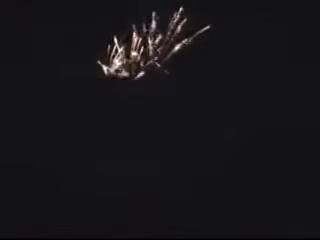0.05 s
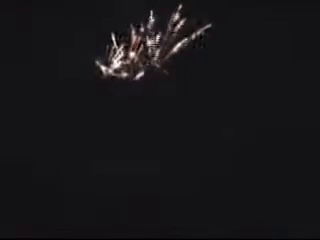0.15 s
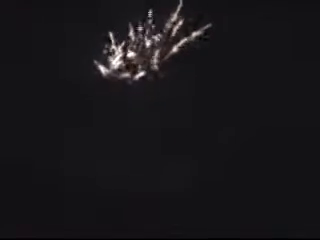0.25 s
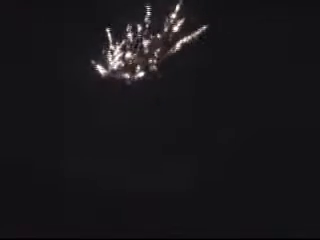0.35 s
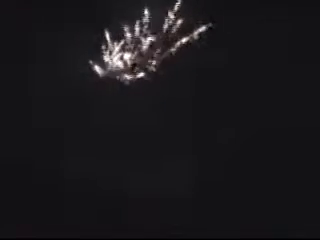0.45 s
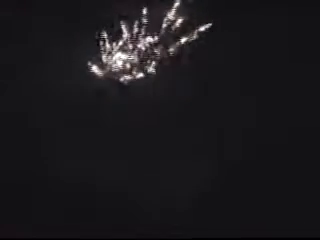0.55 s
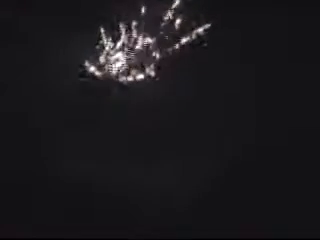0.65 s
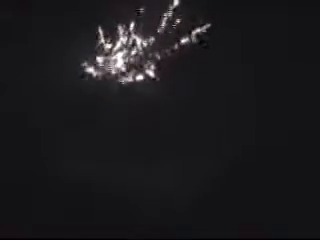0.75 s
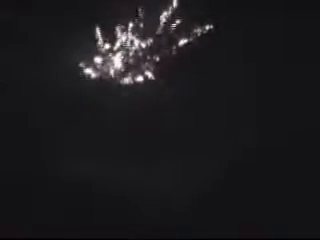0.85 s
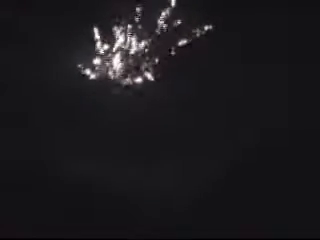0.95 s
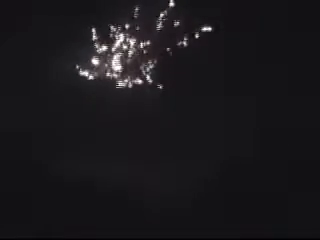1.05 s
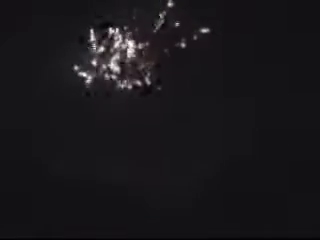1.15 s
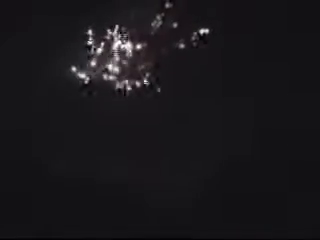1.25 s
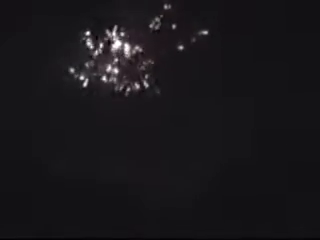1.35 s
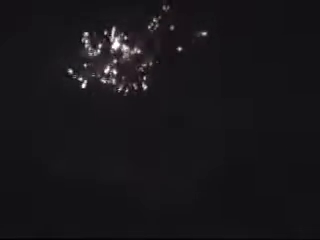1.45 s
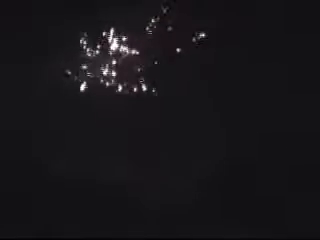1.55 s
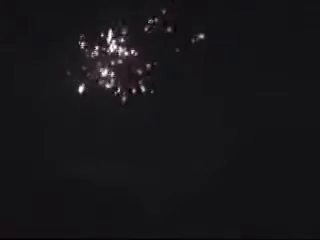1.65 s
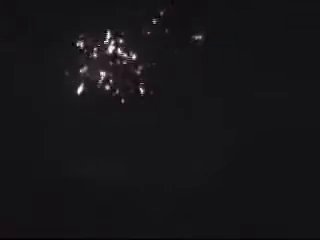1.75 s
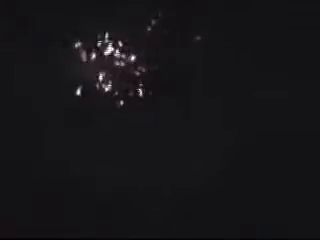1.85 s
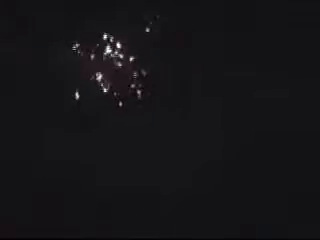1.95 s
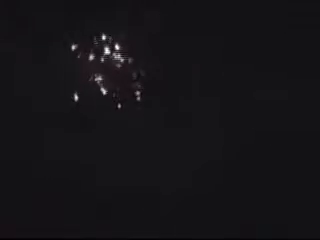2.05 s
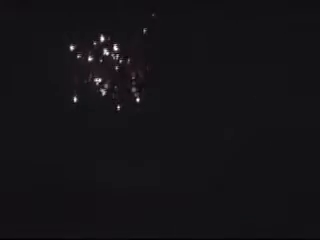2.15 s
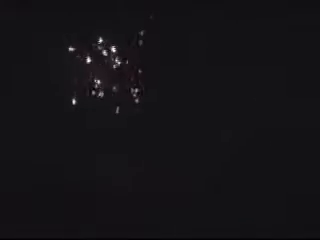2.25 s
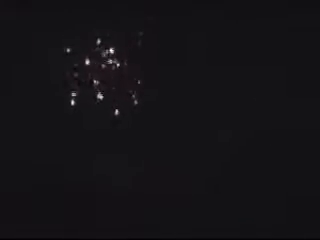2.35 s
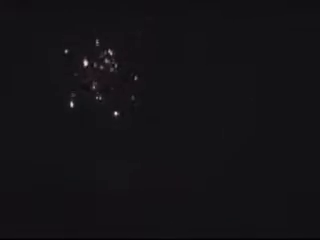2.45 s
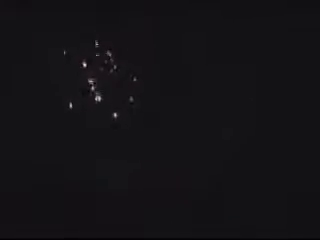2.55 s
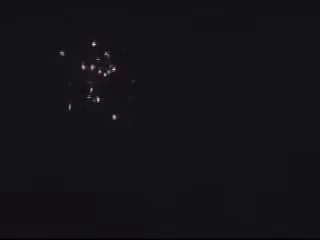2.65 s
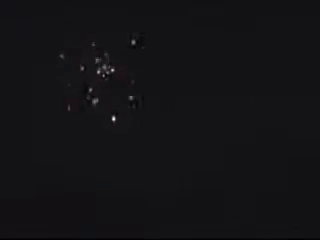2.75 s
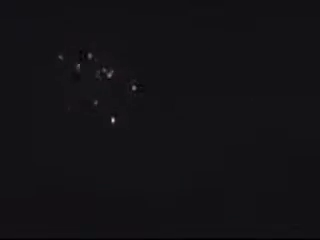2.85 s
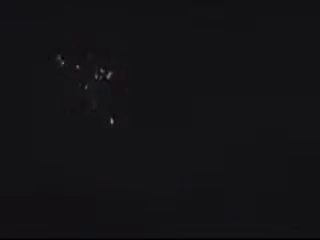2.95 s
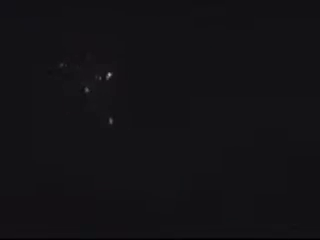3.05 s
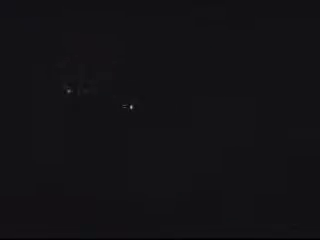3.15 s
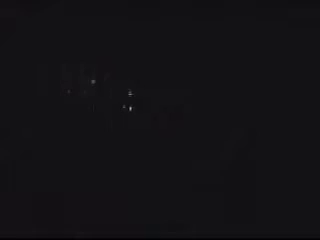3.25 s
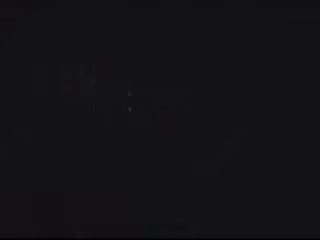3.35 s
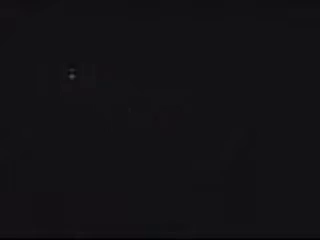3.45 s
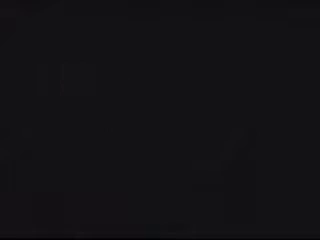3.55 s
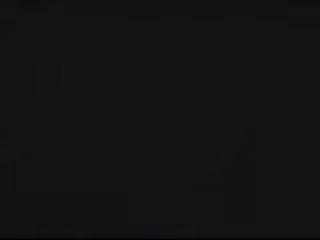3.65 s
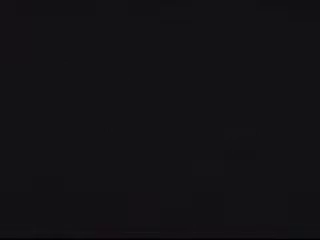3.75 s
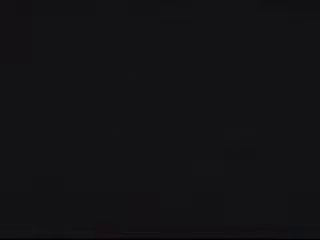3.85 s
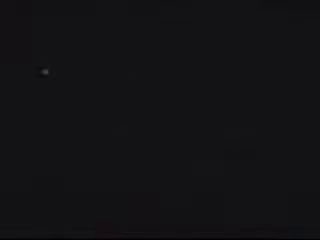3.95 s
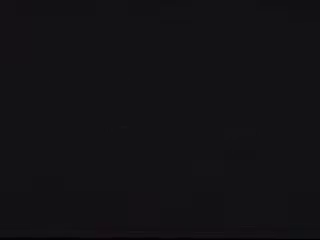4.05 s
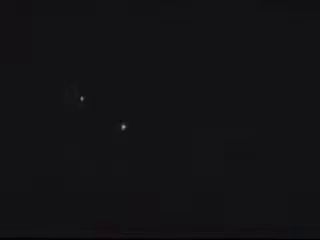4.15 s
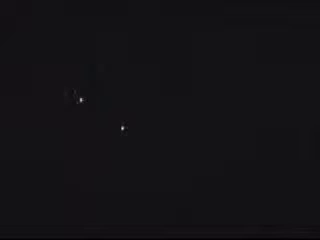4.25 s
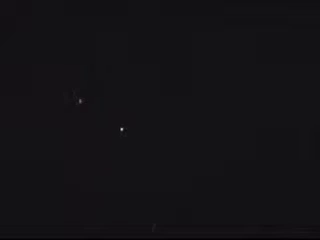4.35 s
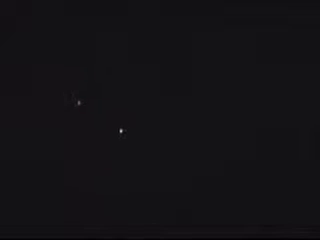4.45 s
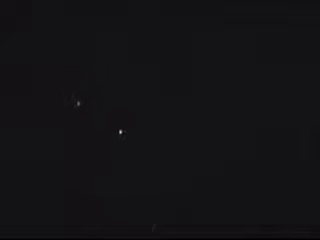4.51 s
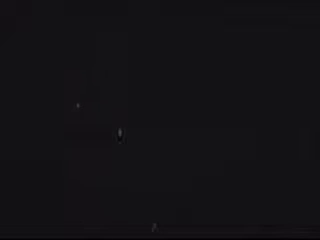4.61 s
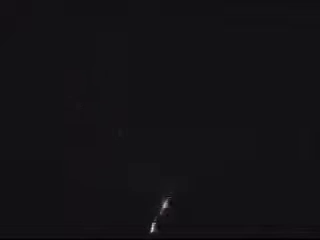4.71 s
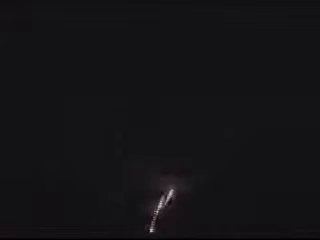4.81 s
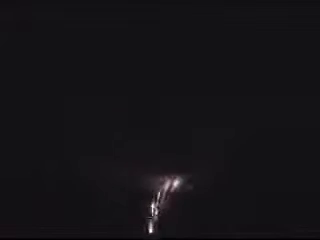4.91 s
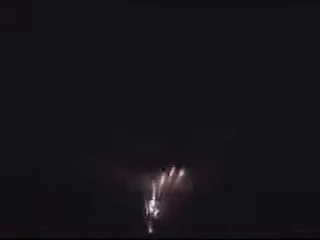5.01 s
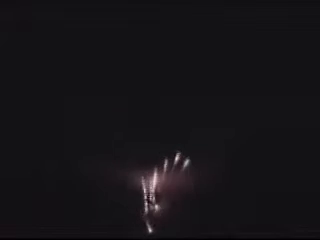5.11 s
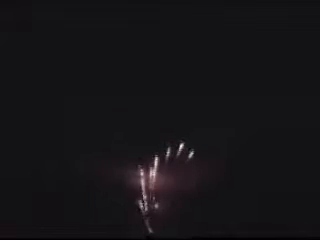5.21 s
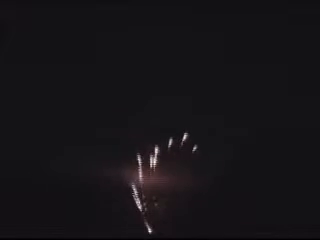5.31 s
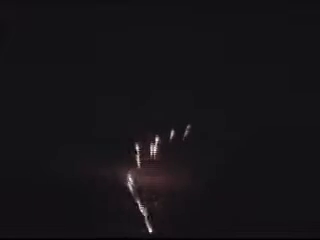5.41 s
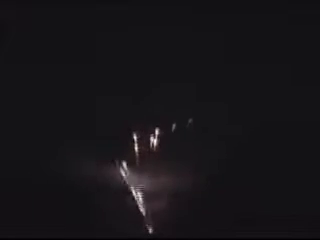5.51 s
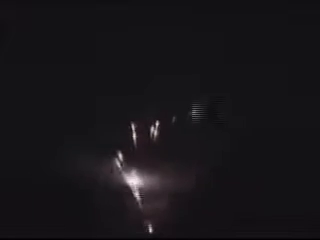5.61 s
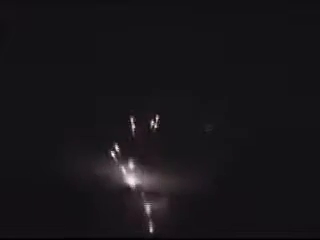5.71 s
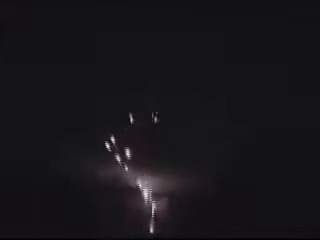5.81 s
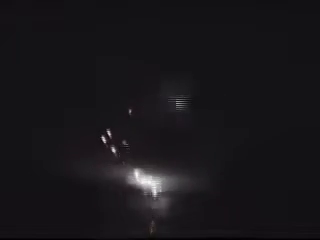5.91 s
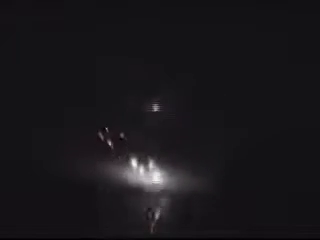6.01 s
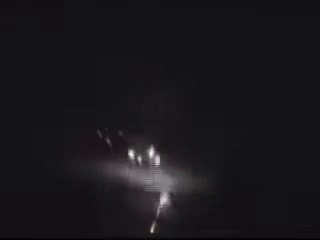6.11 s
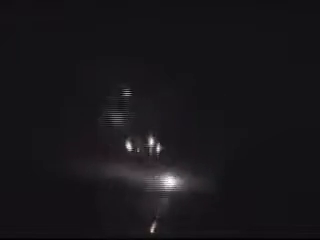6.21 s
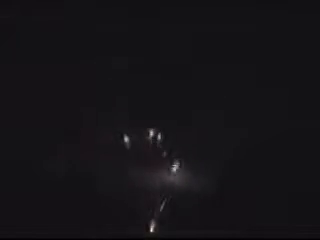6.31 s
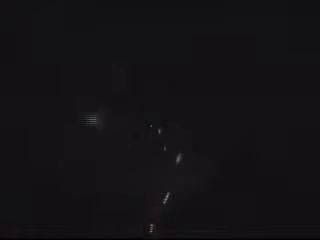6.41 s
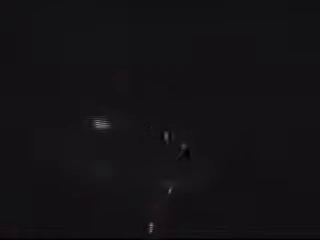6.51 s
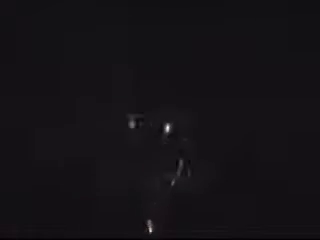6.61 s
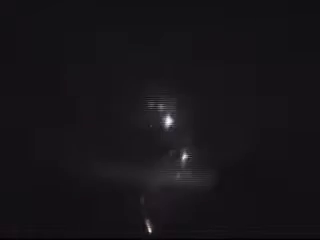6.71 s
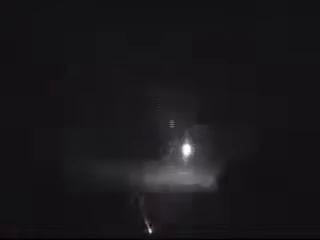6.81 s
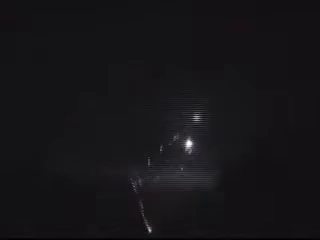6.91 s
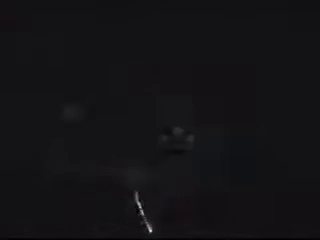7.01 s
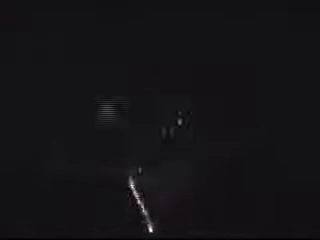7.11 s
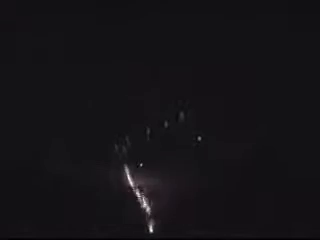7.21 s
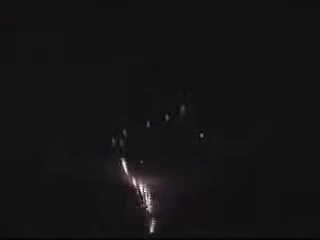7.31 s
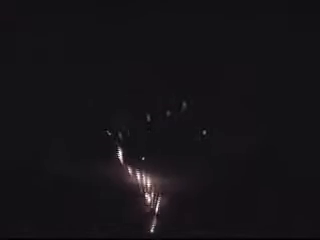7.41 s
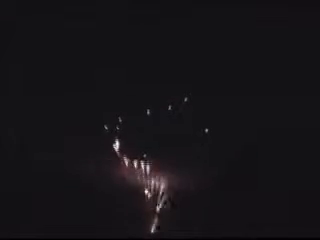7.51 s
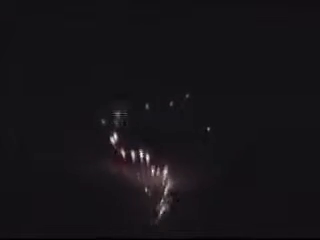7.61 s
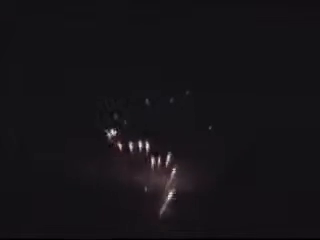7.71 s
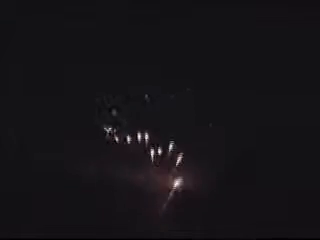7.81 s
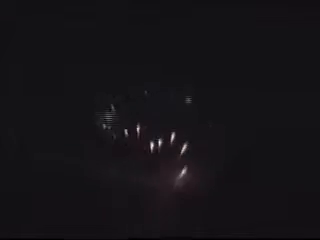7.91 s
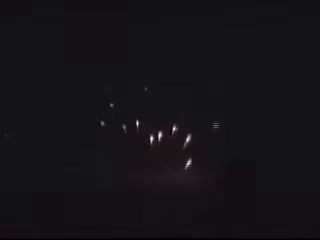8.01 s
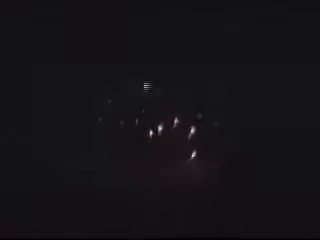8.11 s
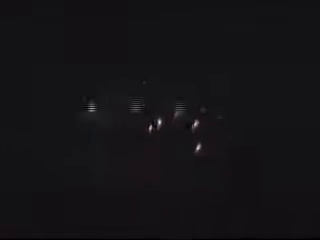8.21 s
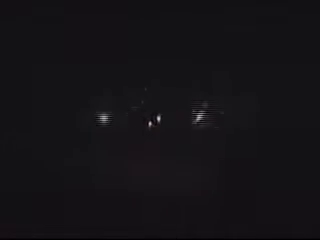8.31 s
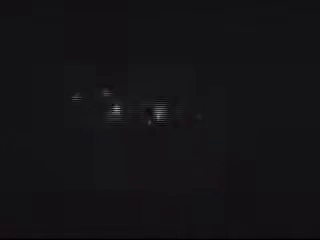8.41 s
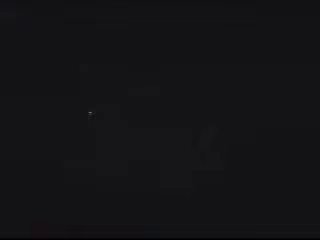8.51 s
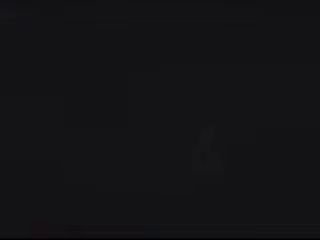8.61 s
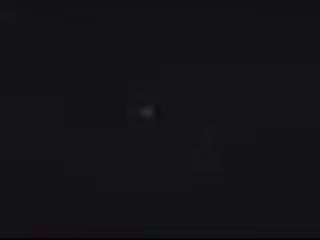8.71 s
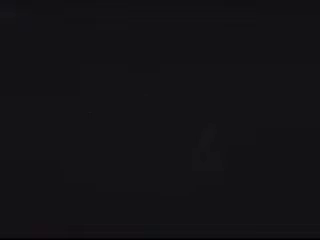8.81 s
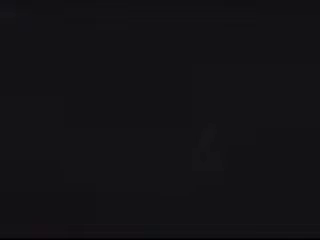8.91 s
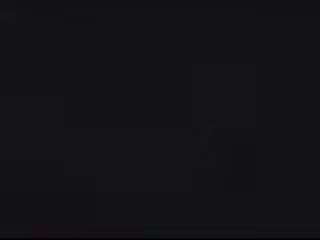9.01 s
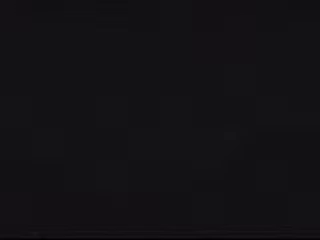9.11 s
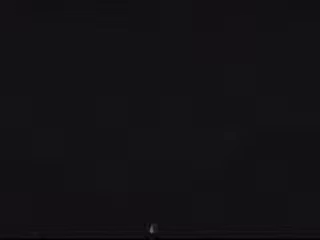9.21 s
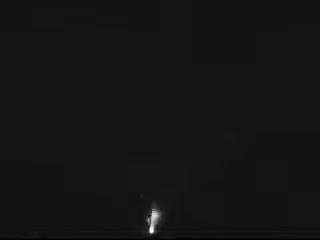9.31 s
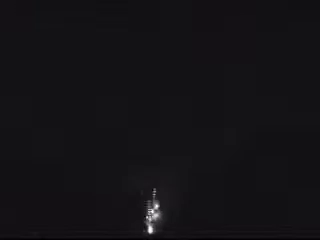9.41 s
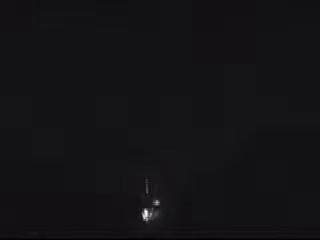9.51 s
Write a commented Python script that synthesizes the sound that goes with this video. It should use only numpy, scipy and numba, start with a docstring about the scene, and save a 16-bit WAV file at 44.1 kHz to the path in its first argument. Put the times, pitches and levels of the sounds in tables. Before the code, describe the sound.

The echo of a firework salvo rolls away into a night of trilling frogs and insects, then a rapid new salvo cracks and bangs.

```python
"""Open country at night: a firework salvo dies away, frogs and insects sing, then the next salvo fires.
Lift charges are noise bursts with a ringing tube and a low thump; stars are sharp shocks with ground bounces.
Trees and land answer with noise shaped by decaying echo levels. Frogs and insects are pulsed tones,
chirps are filtered noise, a cricket sings falling notes, and sparks and night air are coloured noise.
A camera adds its whine, widens the bass and the treble, limits the loudest bangs and clips their tips."""
import sys
import numpy as np
from scipy import signal
from scipy.fft import rfft, irfft, next_fast_len
from scipy.io import wavfile
from scipy.ndimage import uniform_filter1d
from numba import njit

SR = 44100
rng = np.random.default_rng(int(sys.argv[2]) if len(sys.argv) > 2 else 0)


def waveform_to_disk(signal):
    """Save audio, clipped to [-1, 1], as 16-bit WAV at the path in sys.argv[1]."""
    frames = np.transpose(np.atleast_2d(signal))
    scaled = np.clip(frames, -1, 1) * 32767
    samples = np.round(scaled).astype(np.int16)
    wavfile.write(sys.argv[1], SR, samples)


N = 421596
TIME = np.arange(N) / SR


def undb(db):
    """Turn dB into an amplitude factor."""
    return 10 ** (np.asarray(db) / 20)


def unit(x):
    """Scale to rms 1."""
    return x / np.sqrt(np.mean(x ** 2))


def gains(colour, size):
    """Gain of a colour on the bins of a real FFT."""
    hz, db = np.transpose(colour)
    bins_hz = np.fft.rfftfreq(size, 1 / SR)
    return undb(np.interp(np.log(bins_hz + 1), np.log(hz), db))


def tint(x, colour):
    """Filter a sound by a colour."""
    size = x.shape[-1]
    return irfft(rfft(x) * gains(colour, size), size)


def shock(colour, size=512):
    """The most sudden (minimum-phase) pulse of this colour, peak 1."""
    cepstrum = irfft(np.log(gains(colour, size)))
    # fold the cepstrum forward in time to put the energy first
    cepstrum[1:size // 2] *= 2
    cepstrum[size // 2 + 1:] = 0
    pulse = irfft(np.exp(rfft(cepstrum)))
    return pulse / np.abs(pulse).max()


def add(track, s, sound):
    """Mix a sound in at a time in seconds."""
    i = max(int(round(s * SR)), 0)
    part = sound[..., :max(N - i, 0)]
    track[..., i:i + part.shape[-1]] += part


def delay(x, s):
    """The same sound, later."""
    return np.interp(TIME - s, TIME, x, left=0)


def walk(rate, size=N):
    """Random values drawn at a rate per second and joined by straight lines."""
    steps = rng.standard_normal(int(size / SR * rate) + 2)
    return np.interp(TIME[:size] * rate, np.arange(len(steps)), steps)


def place(x, pan_db):
    """Pan by the left level minus the right level."""
    return x * undb(np.array([[pan_db], [-pan_db]]) / 2)


def diffuse(colour, side_db, size=N):
    """Noise from many directions: a shared part plus a part opposed between left and right."""
    mid, side = tint(rng.standard_normal((2, next_fast_len(size))), colour)[:, :size]
    return unit(mid) + undb(side_db) * unit(side) * np.array([[1], [-1]])


def fade(db, fall_db_per_s, hold_s=0):
    """A level that holds, then falls steadily."""
    return undb(db - fall_db_per_s * np.maximum(TIME - hold_s, 0))


# colours of the low, middle and high parts of a shot: (f/Hz, gain/dB)
BARK_COLOUR = [(100, -6), (450, -18.5), (780, -6), (1200, 5.5), (1650, -7), (2400, -44)]
CRACK_COLOUR = [(1200, -28), (1750, -10), (2400, -3.5), (3300, -7.5), (4200, -5.5), (5500, -37)]
SPIT_COLOUR = [(3300, -16), (4600, 2.5), (6400, 3), (9000, -2.5), (10300, -12.5), (11500, -59)]


def lift_crack(t, tube_hz, levels, rise_s=0.00099, decay_s=0.0018, lead_s=0.00015,
               ring_s=0.0018, front_s=0.001122):
    """A sudden front rings the tube inside a scattered burst; each part has its dB over 10 ms."""
    since_peak = t + lead_s
    swell = np.exp(-np.maximum(-since_peak / rise_s, since_peak / decay_s) ** 0.83)
    age = np.maximum(t + front_s, 0)
    ring = np.sqrt(age) * np.exp(-age / ring_s)
    pitches = (1240 * rng.uniform(.87, 1.15), tube_hz, 4600 * rng.uniform(.85, 1.3))
    colours = (BARK_COLOUR, CRACK_COLOUR, SPIT_COLOUR)
    ring_shares = (.5, .5, .2)  # of the power, before the parts are levelled
    out = 0
    for colour, hz, db, share in zip(colours, pitches, levels, ring_shares):
        scatter = unit(swell * diffuse(colour, side_db=-20.5, size=len(t)))
        tone = unit(ring * np.sin(2 * np.pi * hz * age))
        part = np.sqrt(1 - share) * scatter - np.sqrt(share) * tone
        out = out + undb(db) * part / np.sqrt(np.sum(part ** 2) / (2 * SR / 100))
    return out


def sputter(cracks, count=8, latest_s=0.15, return_db=-22):
    """Single trunks throw the cracks back as small stray snaps, weaker when later."""
    lags = rng.uniform(0.01, latest_s, count)
    return sum(undb(return_db - 30 * lag) * np.array([delay(c, lag) for c in cracks]) for lag in lags)


# lift charges in the tubes, levels relative:
# (t/s, tube ring f/Hz, bark level/dB, crack level/dB, spit level/dB, thump level/dB)
LIFT_CHARGES = [(5.066, 2270, -27.5, -17.5, -17.5, -25.5), (5.1949, 2530, -25.5, -14, -19, -20),
                (5.239, 2260, -23, -19, -18, -24.5), (5.323, 2300, -19.5, -16, -21.5, -19),
                (5.3742, 2550, -23.5, -18, -19, -24), (5.4031, 2180, -21, -19, -20.5, -22),
                (5.4369, 2180, -20.5, -15.5, -18, -21), (5.5405, 2550, -26.5, -18.5, -17.5, -25),
                (5.5957, 2360, -24.5, -18, -21.5, -26), (5.6739, 2520, -19.5, -17, -19, -25.5),
                (5.801, 2120, -19.5, -16, -17.5, -24.5), (5.8619, 2730, -19, -17, -21.5, -21.5),
                (5.9021, 2930, -15, -20, -21, -22.5), (5.936, 2270, -25, -17.5, -19.5, -27),
                (6.0471, 2300, -21.5, -19, -22.5, -24), (6.1093, 2490, -25, -19.5, -19.5, -25),
                (6.178, 2700, -25, -19.5, -21.5, -23), (6.2322, 2270, -27, -17.5, -21, -29.5),
                (6.2879, 2810, -22, -16.5, -18.5, -27), (6.3564, 2090, -19.5, -20, -19, -24),
                (6.465, 2170, -20, -20.5, -20, -23.5), (6.609, 2400, -25, -18.5, -19, -32),
                (6.683, 2480, -19, -19.5, -22.5, -33), (6.7505, 2800, -24, -27, -25, -24.5),
                (6.801, 2570, -28, -21, -24, -26), (6.846, 2500, -21, -19.5, -19, -23.5),
                (6.946, 2080, -20.5, -20.5, -19.5, -23), (7.0954, 2380, -22, -20, -23, -21.5),
                (7.1511, 2530, -21.5, -29, -26.5, -28), (7.1928, 2390, -24, -22.5, -22.5, -30),
                (7.227, 2320, -20, -20.5, -24, -26), (7.5046, 2490, -30, -22, -25, -30),
                (7.5587, 2010, -25, -19, -26.5, -31), (7.7195, 2260, -28, -21, -26, -29),
                (7.762, 2510, -26.5, -19.5, -25, -27), (7.8022, 2260, -27, -20.5, -24.5, -27.5),
                (7.911, 2390, -25, -18, -20.5, -22.5), (8.0003, 2130, -26, -20.5, -22, -35)]


def launches(shot_db=1, thump_db=2.5, thump_hz=145, thump_lag_s=0.0065, thump_width_s=0.0046):
    """Each lift charge cracks with its own colour, and its tube thumps just after."""
    cracks, thumps = np.zeros((2, N)), np.zeros(N)
    t = (np.arange(2048) - 512) / SR
    late = t - thump_lag_s
    for s, tube_hz, bark_db, crack_db, spit_db, low_db in LIFT_CHARGES:
        crack = lift_crack(t, tube_hz, (bark_db, crack_db, spit_db))
        add(cracks, s + t[0], undb(shot_db) * crack)
        pitch = thump_hz * (1 + 0.03 * rng.standard_normal())
        tube = np.cos(2 * np.pi * pitch * late) / (1 + (late / thump_width_s) ** 4)
        add(thumps, s + t[0], undb(low_db + thump_db) * tube)
    # a near obstacle returns the crack, a farther one the thump
    cracks = cracks + undb(-14) * np.array([delay(c, 0.024) for c in cracks])
    cracks = cracks + sputter(cracks)
    thumps = thumps + undb(-8.0) * delay(thumps, 0.086)
    return place(cracks, pan_db=-0.2) + place(thumps, pan_db=4.0)


# stars bursting overhead, levels relative: (t/s, level/dB, rolling echo level/dB)
STARS = [(6.1344, 4.5, 7), (6.1854, 5, 2), (6.3898, 7.5, 13), (6.4182, 5.5, 8.5), (6.555, 7, 9),
         (6.6876, 6, 10.5), (6.7323, 4, 2), (6.7662, 3.5, 10.5), (6.9711, 5.5, 4.5), (7.022, -3, -5),
         (7.043, -2.5, 7), (7.1036, 5, 7), (7.133, -2, 0), (7.2545, 4, 3), (7.2866, 4, 4), (7.351, -2.5, 9),
         (7.3783, 2.5, 8), (7.4106, 3, -8), (7.6032, 2.5, 7.5), (7.659, 3.5, 0), (8.1321, 0.5, 6),
         (8.3799, 1, 2.5), (8.3907, -3, 6), (8.4509, -3, -19), (8.4605, -3, -19), (8.5497, -4.5, -9),
         (8.569, 1, 4.5), (8.5997, -3.5, -7), (8.632, -3.5, -11), (8.7352, -3, 2), (8.765, -1.5, -4),
         (8.838, 1.5, 2), (8.9083, 1.5, 1.5), (8.9141, -4, -4), (8.983, -3.5, 6), (8.9855, -5.5, -1),
         (8.9903, -3.5, -5), (9.014, -2, 5.5), (9.2704, -3, 1)]
# colour of a star's shock: (f/Hz, gain/dB)
REPORT_COLOUR = [(40, -16.5), (170, -4.5), (420, -3), (780, 2), (1250, 2.5), (2000, -2.5), (3000, -7.5),
                 (6000, -12.5), (9000, -20), (11500, -76)]


def reports(report_db=4.5, ground_ms=2.42, ground_spread_ms=0.15, bounce_db=-3.5,
            fence_db=-12.0, fence_ms=3.97, scatter_db=-29.0, scatter_s=0.002):
    """Each star sends a clean shock; duller copies follow from the ground and from things nearby."""
    out = np.zeros((2, N))
    pulse = -shock(REPORT_COLOUR)
    dull = signal.sosfilt(signal.butter(1, 2600, fs=SR, output="sos"), pulse)
    t = np.arange(1024) / SR
    scatter_swell = t / scatter_s * np.exp(2 - t / scatter_s)
    for s, db, _ in STARS:
        size = undb(db + report_db)
        ground_s = (ground_ms + ground_spread_ms * rng.standard_normal()) / 1000
        fence_s = (fence_ms + 0.29 * rng.standard_normal()) / 1000
        scatter = scatter_swell * diffuse(REPORT_COLOUR, side_db=-9.0, size=len(t))
        add(out, s, size * pulse)
        add(out, s + ground_s, size * undb(bounce_db) * dull)
        add(out, s + fence_s, size * undb(fence_db) * dull)
        add(out, s, size * undb(scatter_db) * scatter)
    return place(out, pan_db=-0.5)


# colour of the echo from the trees: (f/Hz, gain/dB)
TREELINE_COLOUR = [(60, -38), (300, -6.5), (700, -15.5), (1500, -12), (4000, -1), (8500, 1.5),
                   (11000, -2.5)]


def treeline(bangs, echo_db=-8.0, gap_s=0.003, peak_s=0.11, grain_db=3):
    """A line of trees throws each report back as a grainy swell about a tenth of a second later."""
    t = np.arange(SR) / SR
    late = np.maximum(t - gap_s, 0) / peak_s
    trunks = undb(grain_db * np.repeat(rng.standard_normal(SR // 50), 50))
    swell = (late * np.exp(1 - late)) ** 2
    response = diffuse(TREELINE_COLOUR, side_db=-9.0, size=SR) * trunks * swell
    response /= np.sqrt(np.sum(response ** 2) / 2)
    echo = signal.fftconvolve(bangs.mean(axis=0)[None], response, axes=1)[:, :N]
    return place(undb(echo_db) * echo, pan_db=-1.5)


# quick answers to the first shot and the lowest stars, levels relative: (t/s, level/dB, decay/s)
QUICK_ANSWERS = [(5.067, -20, 0.011), (6.139, -22, 0.063), (6.19, -28, 0.045), (6.394, -24, 0.042),
                 (6.424, -24, 0.07), (8.396, -28, 0.066)]
# colours of the near roll and of the hiss, also played by new_echo: (f/Hz, gain/dB)
NEAR_ROLL_COLOUR = [(50, -50), (150, -20), (300, -21), (480, -3.5), (600, -2.5), (800, 1.5), (1250, -0.5),
                    (1800, -3), (2350, -5.5), (3200, -11.5), (6000, -23.5), (11000, -72)]
HISS_COLOUR = [(300, -14), (700, 0), (1200, 2.5), (1800, 2), (2350, 5.5), (3300, 2.5), (5000, 0),
               (7000, -2), (9300, -9), (10500, -21), (11400, -75)]


def near_answers(roll_db=-2, hiss_db=-3):
    """The nearest trees answer the first shot and the lowest stars at once with decaying noise."""
    level = np.zeros(N)
    for s, db, decay_s in QUICK_ANSWERS:
        add(level, s, undb(db) * np.exp(-TIME[:SR] / decay_s))
    roll = undb(roll_db) * diffuse(NEAR_ROLL_COLOUR, side_db=-10)
    hiss = undb(hiss_db) * diffuse(HISS_COLOUR, side_db=-8)
    return level * (roll + hiss)


def afterglow(bangs, echo_db, gap_s, rise_s, fall_db_per_s, share):
    """Echo level of a run of bangs: each swells after a gap and dies away; their powers add."""
    late = np.maximum(TIME[:3 * SR] - gap_s, 0)
    shape = (1 - np.exp(-late / rise_s)) * undb(-fall_db_per_s * late)
    usual_db = np.mean([db for s, db in bangs])
    power = np.zeros(N)
    for s, db in bangs:
        # share scales how far the bang stands from the usual level
        add(power, s, (undb(echo_db + share * (db - usual_db)) * shape) ** 2)
    return np.sqrt(power)


# colour of the low rumble in the echoes: (f/Hz, gain/dB)
RUMBLE_COLOUR = [(25, -29), (60, -15), (110, -4), (165, -1.5), (240, -6), (350, -14.5), (700, -69),
                 (3000, -81)]


def land_echo(roll, hiss, rumble, roll_colour, hiss_colour, flutter_db, grain_db):
    """Countless returns from trees and ground merge into a fluttering roll, a grainy hiss and a rumble."""
    returns = flutter_db * (walk(45) + walk(300)) / 2
    out = place(diffuse(roll_colour, side_db=-7.5), pan_db=-2.5) * roll * undb(returns)
    grains = undb(returns + grain_db * walk(500))
    out += place(diffuse(hiss_colour, side_db=-10.5), pan_db=-1.0) * hiss * grains
    return out + place(diffuse(RUMBLE_COLOUR, side_db=-11.0), pan_db=3.0) * rumble


def new_echo():
    """Cracks leave a hiss and a roll, thumps a rumble; reports roll back from near, then from far."""
    cracks = [(s, (crack_db + spit_db) / 2) for s, *_, crack_db, spit_db, _ in LIFT_CHARGES]
    thumps = [(s, db) for s, *_, db in LIFT_CHARGES]
    stars = [(s, db) for s, _, db in STARS]
    hiss = afterglow(cracks, echo_db=-32.0, gap_s=0.00064, rise_s=0.018, fall_db_per_s=62, share=1.85)
    rumble = afterglow(thumps, echo_db=-41.5, gap_s=0.0027, rise_s=0.011, fall_db_per_s=61, share=1.0)
    launch_roll = afterglow(cracks, echo_db=-52.5, gap_s=.015, rise_s=0.1, fall_db_per_s=7, share=0.52)
    near_roll = afterglow(stars, echo_db=-24, gap_s=0.079, rise_s=0.062, fall_db_per_s=113, share=1.16)
    far_roll = afterglow(stars, echo_db=-37, gap_s=0.055, rise_s=0.22, fall_db_per_s=8.5, share=0.06)
    roll = np.sqrt(launch_roll ** 2 + near_roll ** 2 + far_roll ** 2)
    return land_echo(roll, hiss, rumble, NEAR_ROLL_COLOUR, HISS_COLOUR, flutter_db=1.4, grain_db=2.5)


def hill_echo(hill_db=-28.0, peak_s=0.74, rise_s=0.33, fall_db_per_s=19):
    """A far slope returns the earlier salvo late, as a narrow, hollow roar."""
    colour = [(200, -29), (500, 2.5), (730, 5), (1050, -1), (1800, -78)]
    swell = np.exp(np.minimum(TIME - peak_s, 0) / rise_s) * fade(hill_db, fall_db_per_s, peak_s)
    return diffuse(colour, side_db=-4.5) * swell * undb(walk(43.9))


# relative level of the crackling hiss in the earlier salvo's echo: (t/s, level/dB)
OLD_HISS_LEVEL = [(0, -22.5), (0.12, -27), (0.23, -30), (0.32, -30.5), (0.4, -42.5), (0.62, -47.5),
                  (0.9, -45.5), (1.3, -70), (2.2, -90)]
# colour of that crackle, dulled by distance: (f/Hz, gain/dB)
OLD_CRACKLE_COLOUR = [(300, -37), (700, -6), (1200, 5), (1750, -3), (2300, 9), (3000, -3), (3700, 1),
                      (5000, -3), (7000, -6.5), (9000, -16.5), (10500, -39), (11400, -69)]
# colour of the roll from far away: (f/Hz, gain/dB)
FAR_ROLL_COLOUR = [(30, -59), (100, -34), (310, -18.5), (480, -6.5), (870, -1), (1150, -5.5), (1700, -17.5),
                   (2400, -16), (3500, -23.5), (7000, -38.5), (11000, -85)]


def old_echo(start_share=0.76, swell_s=0.042):
    """The earlier salvo dies away: crackle first, then the roll, last a faint far roll and rumble."""
    near_roll = fade(-16.0, fall_db_per_s=19.5, hold_s=0.055)
    late_roll = fade(-45.0, fall_db_per_s=4.0, hold_s=0.99)
    roll = np.hypot(near_roll, late_roll)
    hiss = undb(np.interp(TIME, *np.transpose(OLD_HISS_LEVEL)))
    rumble = np.hypot(fade(-43.0, fall_db_per_s=18.5, hold_s=.1), fade(-59.5, fall_db_per_s=3, hold_s=1.3))
    swell = np.interp(TIME, [0, swell_s], [start_share, 1])
    echo = land_echo(roll, hiss, rumble, FAR_ROLL_COLOUR, OLD_CRACKLE_COLOUR, flutter_db=1.9, grain_db=1.0)
    return swell * echo + hill_echo()


# colour of the glittering sparks: (f/Hz, gain/dB)
SIZZLE_COLOUR = [(800, 6.5), (2400, -10), (4000, 5.5), (6500, 3), (10000, -3.5), (12000, -19)]


def sparks(sizzle_db=-52, peak_s=1.34, fall_db_per_s=5):
    """The glitter of the earlier salvo sizzles softly while it burns out."""
    glow = np.minimum(TIME / peak_s, 1) * fade(sizzle_db, fall_db_per_s, peak_s)
    return place(diffuse(SIZZLE_COLOUR, side_db=-14), pan_db=-0.5) * glow * undb(1.5 * walk(200))


def pulsed_calls(calls, glide, duty, rasp):
    """Even trains of short gliding pulses that swell and then stop quickly."""
    out = np.zeros(N)
    for s, length, hz, rate, db in calls:
        t = np.arange(int(length * SR)) / SR
        cycle = (t * rate + .02 * walk(25, size=len(t))) % 1 - .5
        pitch = hz * (1 + glide * cycle + rasp * rng.standard_normal(len(t)))
        tone = np.sin(2 * np.pi * np.cumsum(pitch) / SR)
        swell = np.sqrt(np.clip(np.minimum(t / .09, (length - t) / .06) / length, 0, 1))
        level = undb(db + 0.36 * walk(40, size=len(t)))
        add(out, s, level * swell * np.exp(-(cycle / duty) ** 2) * tone)
    return out


# near tree frog trills, levels relative: (t/s, length/s, f/Hz, pulse rate/Hz, level/dB)
FROG_TRILLS = [(1.655, 0.47, 2515, 56, -41), (2.8, 0.5, 2450, 59, -51), (3.55, 0.43, 2355, 60, -45),
               (4.019, 0.46, 2520, 46, -42), (4.9, 0.27, 2500, 65, -51)]


def tree_frogs(chorus_hz=2450, chorus_db=-56):
    """Near frogs trill in rising pulses over an overlapping chorus of fainter ones."""
    chorus = [(s, .5, chorus_hz * rng.uniform(0.93, 1.04), rng.uniform(48.3, 69), chorus_db)
              for s in np.arange(0, N / SR, .3)]
    return pulsed_calls(FROG_TRILLS + chorus, glide=0.308, duty=0.14, rasp=0.11)


# short frog chirps, levels relative: (t/s, level/dB)
SMALL_FROGS = [(1.626, -52), (1.874, -51), (2.109, -50), (2.376, -57), (2.674, -50), (2.79, -51),
               (2.931, -53.5), (2.997, -53), (3.158, -54), (3.181, -54), (3.312, -55), (3.426, -51),
               (3.457, -53), (3.609, -53.5), (3.664, -53.5), (3.9, -52), (4.125, -52.5), (4.335, -46.5),
               (4.574, -48), (4.737, -52), (4.8, -53), (4.862, -54), (4.983, -51)]


def frog_chirps(chirp_db=-0.5, peak_s=0.0092, throb_hz=85, throb=0.26):
    """Short raspy chirps: throbbing swells of noise coloured by a small throat."""
    swell = np.zeros(N)
    t = np.arange(SR // 10) / SR
    puff = (t / peak_s * np.exp(1 - t / peak_s)) ** 2 * (1 - throb * np.cos(2 * np.pi * throb_hz * t))
    for s, db in SMALL_FROGS:
        add(swell, s, undb(db + chirp_db) * puff)
    throat = [(2400, -45), (3000, -9), (3300, -11.0), (3520, 2), (3800, -8), (4200, -32), (5000, -50)]
    return swell * unit(tint(rng.standard_normal(N), throat))


def cricket(song_hz=5130, song_db=-57.5, count=4):
    """Each closing of the wings gives one clean falling note; four evenly spaced strokes make a phrase."""
    first_s, period_s, gap_s, note_s, sag_hz_per_s = .11, .22, .042, .008, 17000
    out = np.zeros(N)
    t = (np.arange(2048) - 1024) / SR
    note = np.exp(-(t / note_s) ** 2) * np.sin(2 * np.pi * (song_hz - sag_hz_per_s * t / 2) * t)
    for s in np.arange(first_s, N / SR, period_s):
        for k in range(count):
            add(out, s + k * gap_s + t[0], undb(song_db + 2 * rng.standard_normal()) * note)
    return out


# insect buzzes, levels relative: (t/s, length/s, f/Hz, pulse rate/Hz, level/dB)
INSECT_BUZZES = [(3.22, 0.13, 6050, 80, -53), (4.56, 0.13, 6100, 85, -51.5)]


def insect_buzzes():
    """An insect buzzes in rapid falling pulses."""
    return pulsed_calls(INSECT_BUZZES, glide=-0.22, duty=.3, rasp=0.1)


def wildlife(trees_db=-12):
    """Frogs, a cricket and an insect call among trees, which give them a short, soft tail."""
    calls = tree_frogs() + frog_chirps() + cricket() + insect_buzzes()
    t = np.arange(SR // 2) / SR
    trees = rng.standard_normal((2, len(t))) * np.exp(-t / 0.087)
    trees /= np.sqrt(np.sum(trees[0] ** 2))
    tail = signal.fftconvolve(calls[None], trees, axes=1)[:, :N]
    return place(calls, pan_db=-1.5) + undb(trees_db) * tail


# colour of the open country at night: (f/Hz, gain/dB)
NIGHT_COLOUR = [(25, -8), (70, 7), (165, 4), (250, -1.5), (700, 10), (1000, 2.5), (1400, 4), (2000, 0.5),
                (2500, -1.5), (4200, -9), (5600, -9.5), (6700, -4), (7800, -14.5), (12000, -25.5)]


def night_air(air_db=-51.5):
    """A low, even murmur of open country, made of wide coloured noise."""
    return place(diffuse(NIGHT_COLOUR, side_db=-1), pan_db=-1) * undb(air_db + .5 * walk(3.08))


def dry_tick(tick_s=0.95, tick_db=-12):
    """One dry tick close by: a sudden pulse and a weaker copy just after."""
    out = np.zeros(N)
    tick = -shock([(300, -22), (1500, -4), (4000, 4.5), (8000, -6), (12000, -14.5)])
    add(out, tick_s, undb(tick_db) * tick)
    add(out, tick_s + 0.0039, undb(tick_db - 8) * tick)
    return out


# faint steady hums and the whine of the camera: (f/Hz, rms level/dB)
CAMERA_TONES = [(680, -67.5), (1274, -65.5), (1873, -67)]


def camera_whine():
    """The faint hums and whine are steady sines."""
    return sum(undb(db) * np.sqrt(2) * np.sin(2 * np.pi * hz * TIME) for hz, db in CAMERA_TONES)


def scene():
    """The fading echo of one salvo, the quiet night, then the next salvo with its own echo."""
    bangs = reports()
    salvo = launches() + near_answers() + bangs + treeline(bangs) + new_echo()
    background = night_air() + wildlife() + dry_tick() + camera_whine()
    return old_echo() + sparks() + background + salvo


# the camera's close microphones widen the bass and the treble: (f/Hz, side gain/dB)
SIDE_COLOUR = [(40, 6.5), (250, 3.5), (500, -3.5), (1100, -2), (2500, -1), (5000, 0), (10000, 2)]


def microphones(sound):
    """Split into mid and side, colour the side, and join them again."""
    mid = (sound[0] + sound[1]) / 2
    side = tint((sound[0] - sound[1]) / 2, SIDE_COLOUR)
    return np.array([mid + side, mid - side])


@njit
def follow(size, release):
    """Jump to each peak, then sink back."""
    out, held = np.empty(len(size)), 0.
    for i in range(len(size)):
        held = max(size[i], held * release)
        out[i] = held
    return out


def record(dry):
    """The camera's limiter ducks at the loudest bangs and recovers; shock tips clip; the top is cut."""
    ceiling, release_s, top_hz = 1.4, .06, 12000
    dry = microphones(dry)
    peaks = follow(np.abs(dry).max(axis=0), np.exp(-1 / (release_s * SR)))
    gain = uniform_filter1d(np.minimum(1, ceiling / (peaks + 1e-9)), size=16)
    limited = np.clip(dry * gain, -.9, .9)
    low_pass = signal.ellip(8, .1, 70, top_hz, fs=SR, output="sos")
    return signal.sosfiltfilt(low_pass, limited)


dry = scene()
out = record(dry)
waveform_to_disk(out)
```